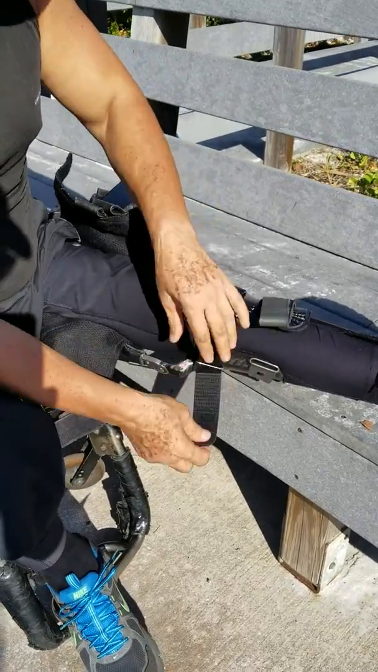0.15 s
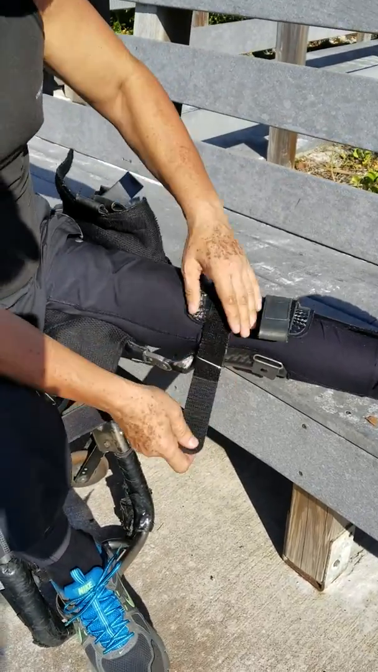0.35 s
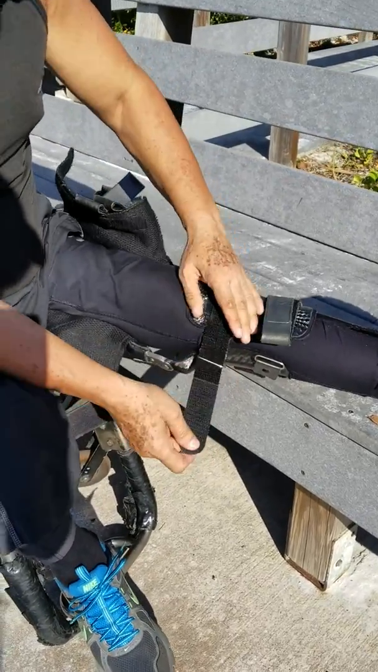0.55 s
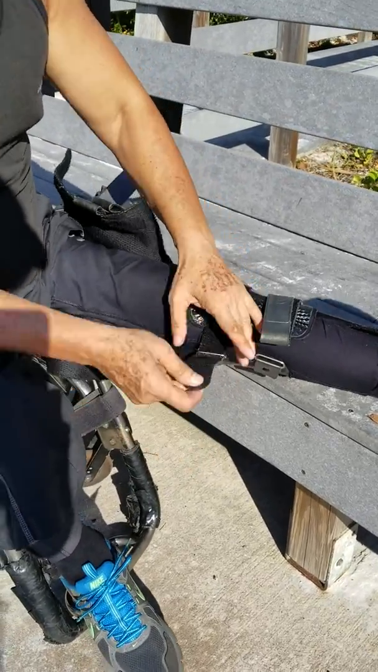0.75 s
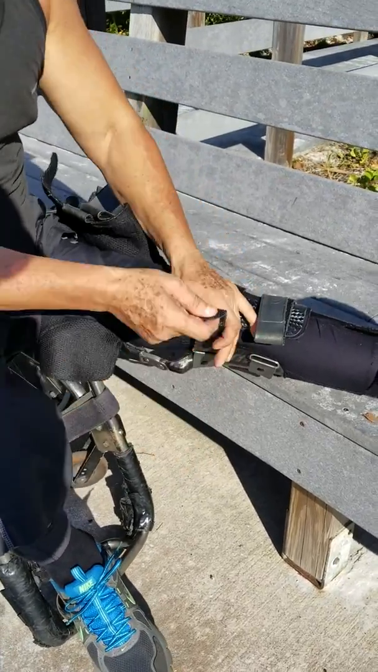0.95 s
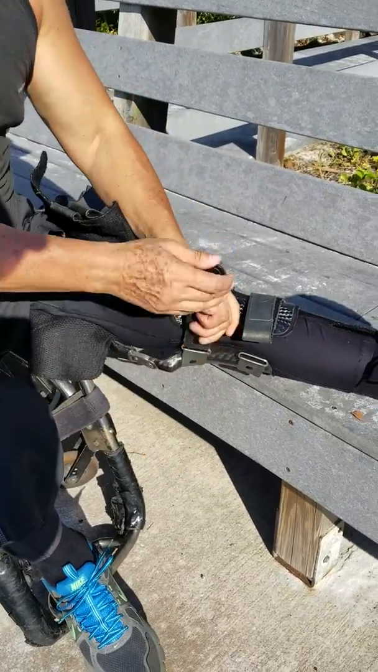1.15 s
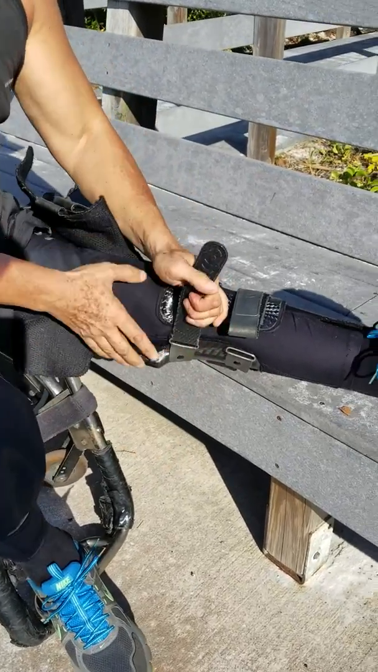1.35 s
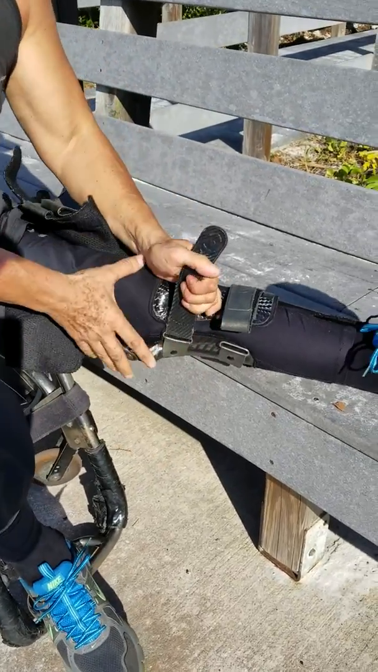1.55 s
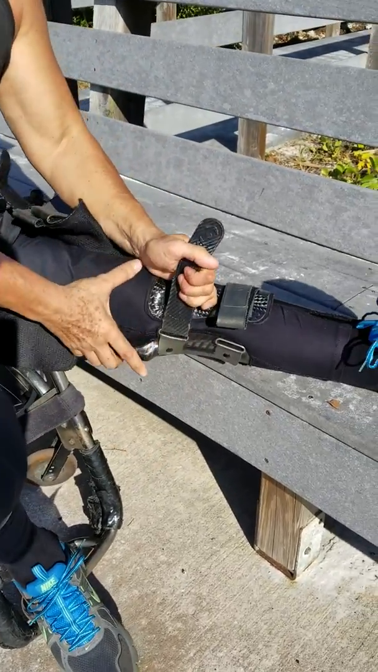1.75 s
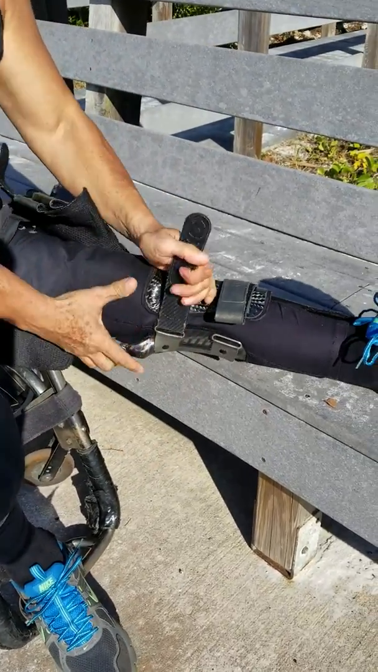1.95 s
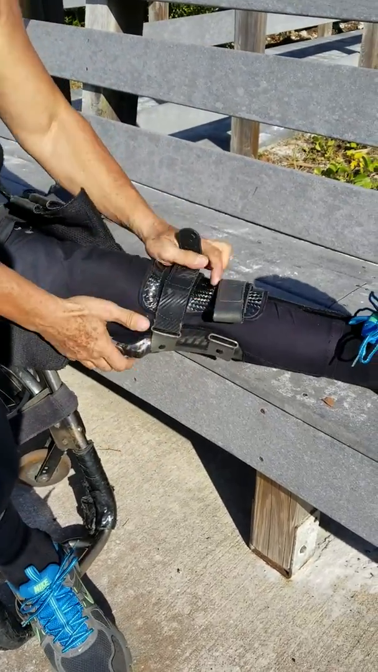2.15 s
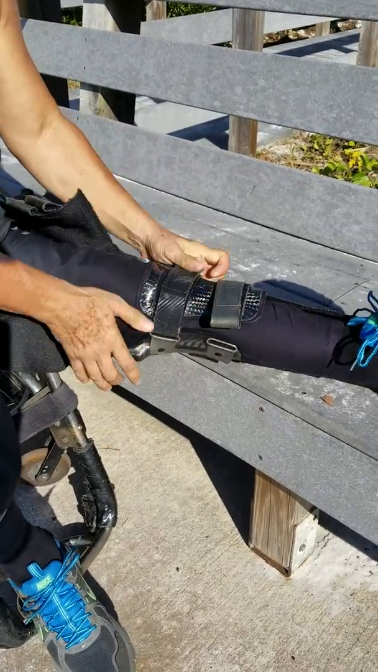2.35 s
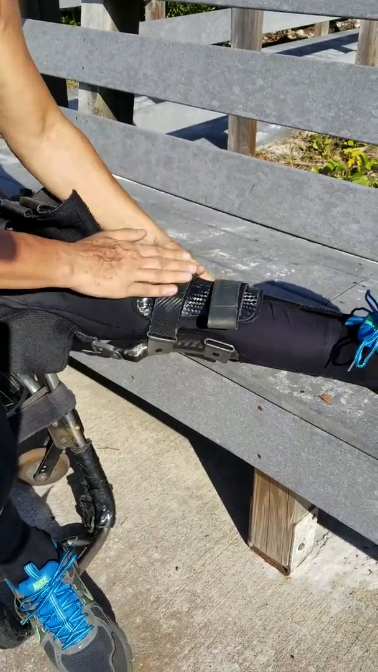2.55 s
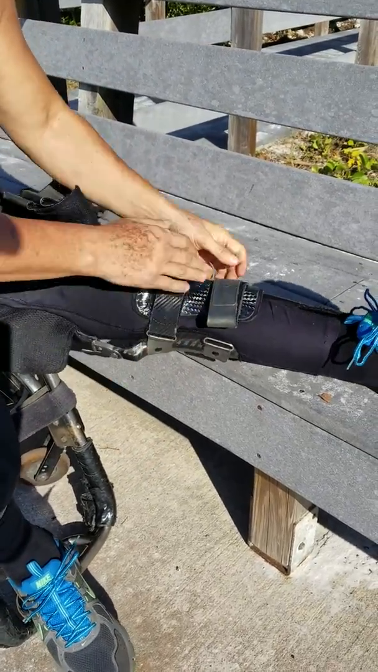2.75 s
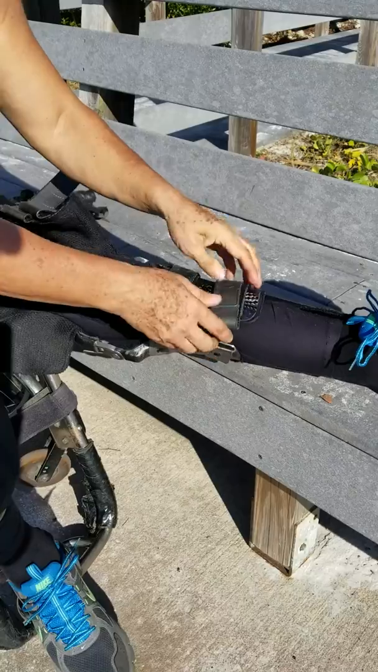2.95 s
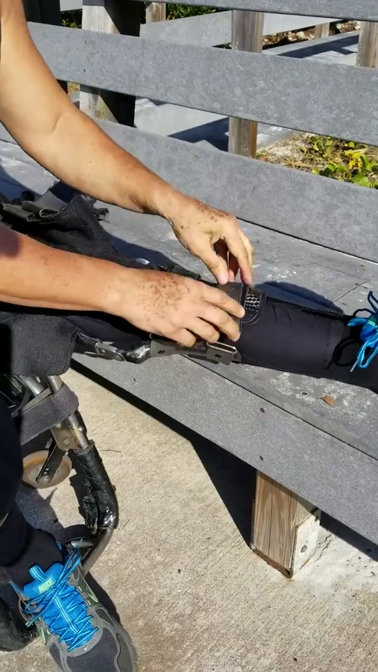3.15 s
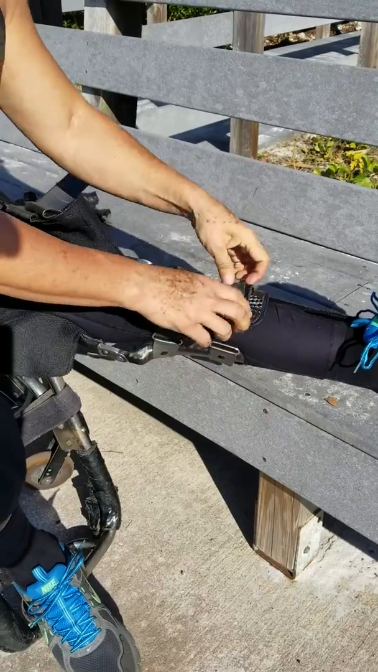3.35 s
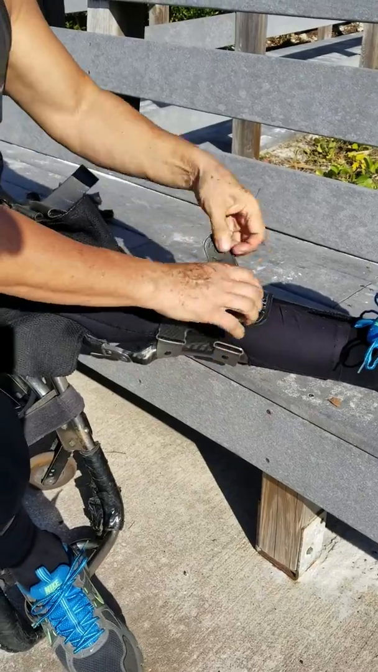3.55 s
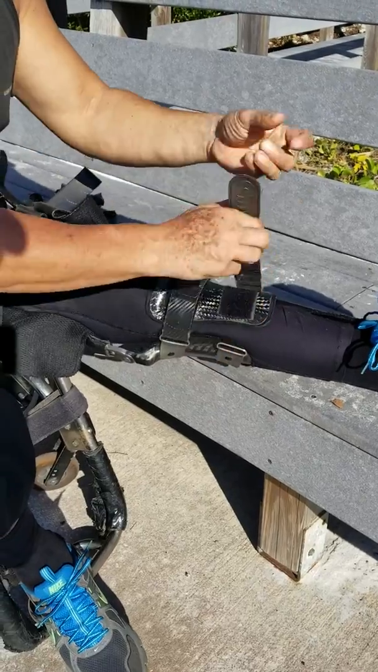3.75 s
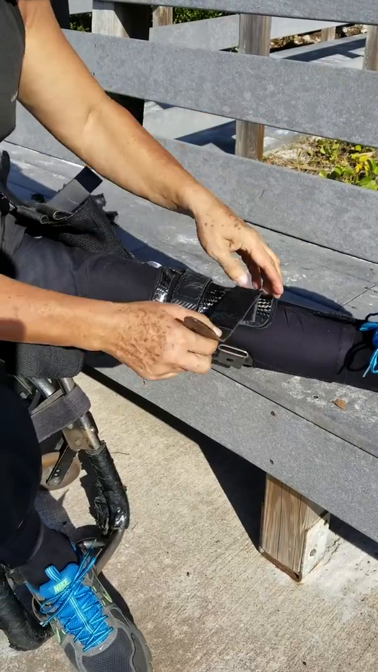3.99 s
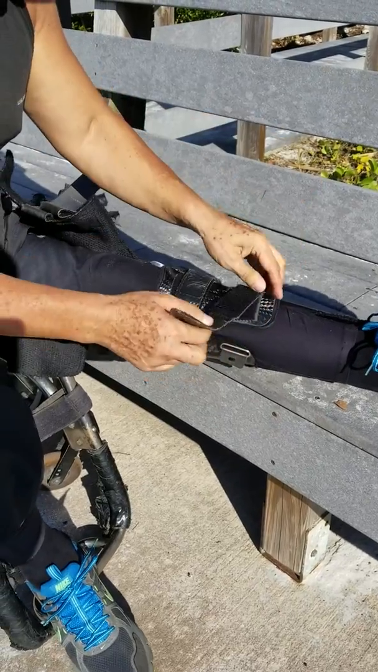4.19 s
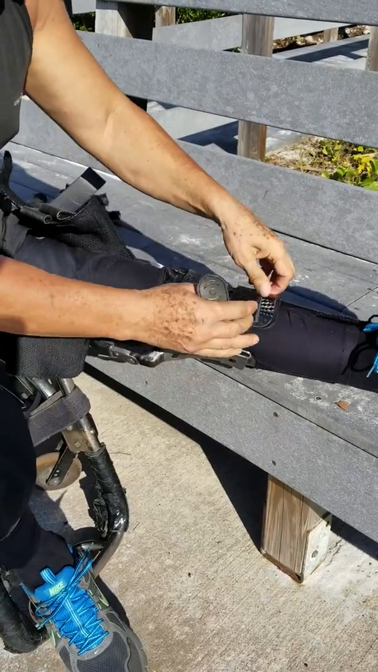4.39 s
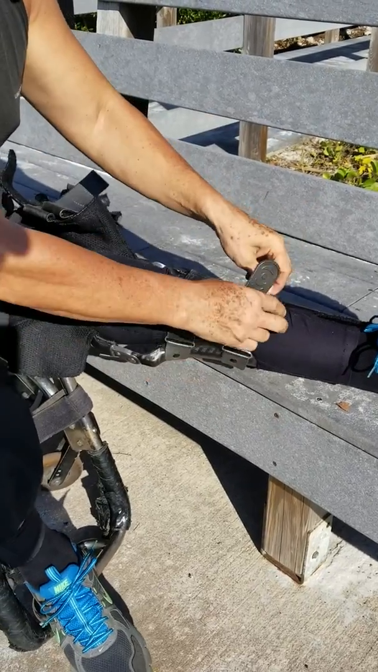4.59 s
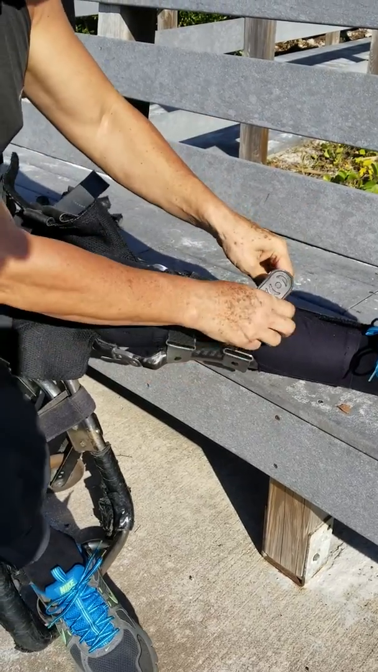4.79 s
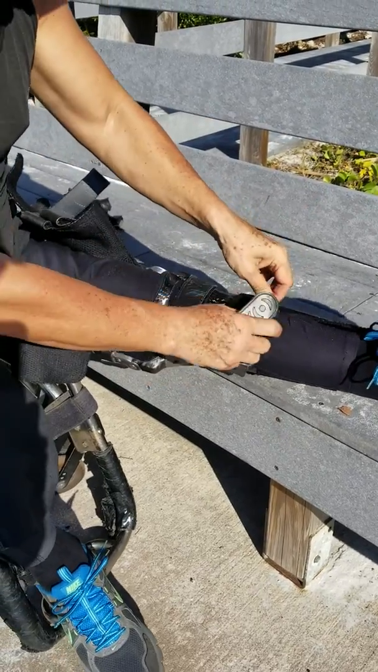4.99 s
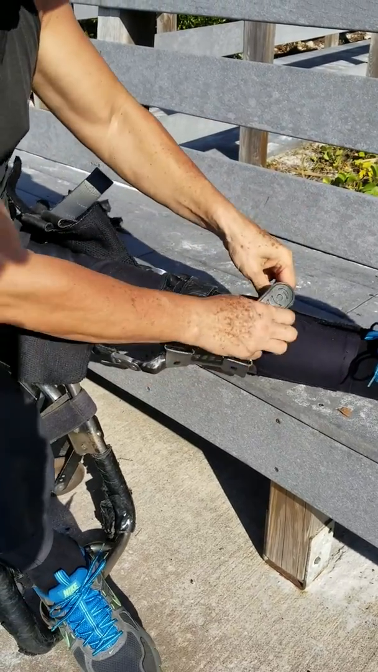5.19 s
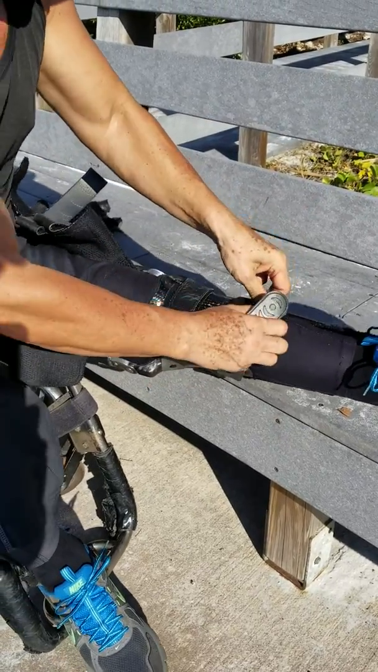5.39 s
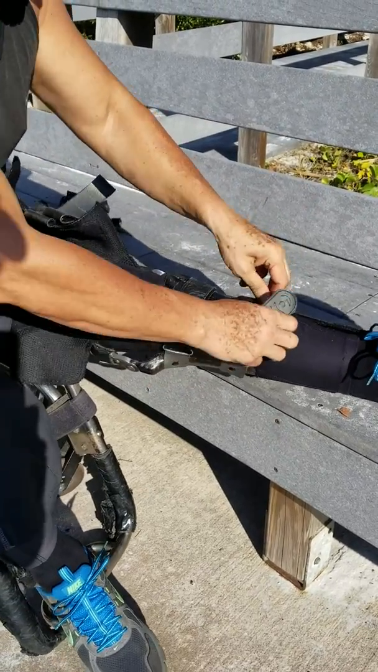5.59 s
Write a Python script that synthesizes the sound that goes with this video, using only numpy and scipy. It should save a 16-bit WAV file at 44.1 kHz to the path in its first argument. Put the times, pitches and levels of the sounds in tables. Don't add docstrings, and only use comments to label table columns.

```python
import sys
import numpy as np
from scipy import signal
from scipy.fft import rfft, irfft, next_fast_len
from scipy.io import wavfile
from scipy.ndimage import uniform_filter1d

SR = 44100
rng = np.random.default_rng(int(sys.argv[2]) if len(sys.argv) > 2 else 0)


def store_pcm(level_fs):
    pcm = np.round(np.clip(level_fs, -1, 1) * 32767).astype(np.int16)
    wavfile.write(sys.argv[1], SR, np.atleast_2d(pcm).T)


def makeup_ratio(level_db):
    decades = np.asarray(level_db, float) / 20
    return 10 ** decades


N = 248283
TIME = np.arange(N) / SR


def unit(x):
    return x / np.sqrt(np.mean(x ** 2) + 1e-20)


def along(points, hz):
    point_hz, value = np.transpose(points)
    return np.interp(np.log(hz + 1), np.log(point_hz + 1), value)


def filtered(x, response):
    size = next_fast_len(N + 8192)
    hz = np.fft.rfftfreq(size, 1 / SR)
    return irfft(rfft(x, size) * response(hz), size)[..., :N]


def shaped(spectrum):
    return lambda hz: makeup_ratio(along(spectrum, hz))


def ringing(modes):
    def response(hz):
        total = 0
        for k, (mode_hz, width_hz, db) in enumerate(modes):
            damping = 1j * hz * width_hz
            total = total + (-1) ** k * makeup_ratio(db) * damping / (mode_hz ** 2 - hz ** 2 + damping)
        return total
    return response


def crackle(per_s, spread_db, life_s, steady):
    happens = rng.random(N) < per_s / SR
    sizes = happens * makeup_ratio(spread_db * np.minimum(rng.exponential(size=N), 3))
    train = signal.lfilter([1], [1, -np.exp(-1 / (life_s * SR))], sizes)
    return unit((unit(train) + steady) * rng.standard_normal((2, N)))


def ports(pair, alike, lead_s):
    def shares(hz):
        turn = np.arccos(np.clip(along(alike, hz), -1, 1)) / 2
        return np.array([np.cos(turn), np.sin(turn)])
    mid, side = filtered(pair, shares)
    delay = lambda hz: np.exp(2j * np.pi * np.outer([0, -lead_s], hz))
    return filtered(np.array([mid + side, mid - side]), delay)


# pitch_hz [Hz], level_db [dB]
SHADE = [(600, 0), (2000, -3), (5000, -3), (9000, -5), (15000, -0.5)]


def shaded(x):
    return filtered(x, lambda hz: makeup_ratio(np.outer([.5, -.5], along(SHADE, hz))))


def engine(rows):
    start_s, pitch_hz, level_db = np.transpose(rows)
    flutter = unit(uniform_filter1d(rng.standard_normal((2, N)), size=2500))
    turns = np.cumsum(np.interp(TIME, start_s, pitch_hz) + 2.6 * flutter[0]) / SR
    loudness = makeup_ratio(np.interp(TIME, start_s, level_db) + 2.0 + 4.0 * flutter[1])
    return loudness * np.sin(2 * np.pi * turns) * [[1], [0]]


# pitch_hz [Hz], level_db [dB per Hz]
TRAFFIC = [(12, -48.5), (20, -35), (70, 0.5), (227, -22.5), (324, -17.5), (698, -33), (754, -31.5),
           (1230, -37), (2100, -36), (2780, -37), (9000, -54), (11700, -82), (19800, -120)]
# start_s [s], pitch_hz [Hz], level_db [dB]
ENGINES = [
    [(0.0, 61.72, -66), (4.75, 63.95, -67), (5.63, 63.5, -59.5)],
    [(0.0, 80.3, -67), (0.69, 102.1, -67.5), (5.63, 79.58, -65)],
    [(0.0, 139.2, -71.5), (5.52, 138.5, -70.5), (5.63, 125.4, -75)],
]
# start_s [s], level_db [dB]
WHINE = [
    (0.0, -95),
    (0.11, -81.5),
    (5.63, -82),
]
# pitch_hz [Hz], likeness [-1 to 1]
FAR_ALIKE = [(60, 0.59), (180, 0.98), (550, 0.67), (1650, -0.14), (4970, 0.0), (15000, 0.0)]


def traffic():
    z = signal.stft(rng.standard_normal((2, N)), nperseg=1024)[2]
    patches = uniform_filter1d(rng.standard_normal(z.shape[1:]), size=6, axis=0)
    patches = unit(uniform_filter1d(patches, size=14, axis=1))
    air = signal.istft(z * makeup_ratio(2.4 * patches), nperseg=1024)[1][:, :N]
    road = makeup_ratio(-61.5) * unit(filtered(air, shaped(TRAFFIC)))
    whine = unit(filtered(air, ringing([(1180, 130, 0)])))
    whine = makeup_ratio(np.interp(TIME, *np.transpose(WHINE))) * whine
    whine = whine * makeup_ratio(5 * unit(uniform_filter1d(rng.standard_normal(N), size=4000)))
    engines = sum(engine(rows) for rows in ENGINES)
    return shaded(ports(road + makeup_ratio(0.5) * whine + engines, FAR_ALIKE, lead_s=0))


def swells(table):
    swell_db = 12
    level_db = np.full(N, -140.)
    for peak_s, rise_s, fall_s, db in table:
        late = TIME - peak_s
        level_db = np.maximum(level_db, db - swell_db * np.maximum(late / fall_s, -late / rise_s))
    return level_db


# peak_s [s], rise_s [s], fall_s [s], fibre_hiss_db [dB], weave_extra_db [dB]
STROKES = [(0.166, 0.13, 0.085, -65, 9), (.24, .1, 0.029, -66, -4), (.7, 0.26, 0.18, -66.5, -2),
           (.99, 0.032, .06, -75, 5), (1.106, 0.028, 0.034, -59, -30), (1.17, 0.11, 0.1, -71, -2),
           (1.4, 0.078, .1, -71, -23), (1.62, 0.18, 0.43, -77.5, -2.5), (1.98, 0.17, 0.34, -73, -0.5),
           (2.19, 0.18, 0.11, -62.5, 2.5), (2.37, 0.23, .15, -67.5, -2.5), (2.53, 0.24, 0.081, -69, 4),
           (2.62, 0.081, .15, -71, 10), (3.12, 0.135, 0.089, -82, 7), (3.7, 0.024, 0.24, -70.5, -0.5),
           (4.03, 0.052, 0.19, -72.5, -0.2), (4.245, 0.13, .1, -73.5, 0.5), (4.345, 0.064, 0.038, -66, -5),
           (4.486, .02, 0.083, -69, -3), (4.71, 0.068, 0.23, -69.5, 0.5), (4.91, 0.12, 0.37, -69.5, 4),
           (5.05, .1, 0.14, -70, 3.5), (5.4, .02, 0.21, -75, 7), (5.53, 0.27, .1, -71.5, -3)]
# peak_s [s], rise_s [s], fall_s [s], level_db [dB]
RUBS = [(.1, 0.12, .08, -64), (.245, 0.13, .03, -65), (.56, 0.081, 0.26, -64.5), (.8, 0.18, .25, -62.5),
        (1.04, 0.19, .3, -59), (1.14, 0.13, .1, -55.5), (1.96, .12, 0.19, -70.5), (2.16, .1, 0.046, -72),
        (2.27, .05, 0.065, -62.5), (2.45, 0.03, 0.044, -65), (2.62, 0.035, 0.08, -59),
        (2.82, 0.35, 0.35, -69.5), (3.15, .2, 0.27, -66), (3.7, 0.056, 0.087, -65.5),
        (3.99, 0.17, 0.27, -64.5), (4.245, 0.16, 0.073, -63.5), (4.33, .05, 0.066, -61.5),
        (4.57, .15, .08, -75), (4.72, .03, .3, -68.5), (4.87, 0.26, 0.32, -70), (5.03, 0.033, 0.029, -63),
        (5.25, 0.36, 0.044, -67), (5.39, 0.068, 0.22, -66)]
# pitch_hz [Hz], level_db [dB per Hz]
FIBRE = [(2940, -11.5), (5000, 0), (6010, -2), (6470, -4.5), (7630, -0.5), (11100, -8), (12100, -6.5),
         (14500, -9), (15900, -13)]
# pitch_hz [Hz], level_db [dB per Hz]
WEBBING = [(760, -4), (1300, 1.5), (1440, -11.5), (1560, -2), (2460, -4.5), (2680, 2.5), (3760, 1),
           (5500, -18.5), (7150, -22), (12100, -120)]
# pitch_hz [Hz], level_db [dB per Hz]
RUB = [(140, -26.5), (230, -16.5), (405, -5), (653, -14), (728, -22.5), (885, -15.5), (1050, -27),
       (1300, -25), (1690, -40), (2860, -120)]


def sliding():
    hiss_db = swells([row[:4] for row in STROKES])
    rub_db = swells(RUBS)
    weave_db = swells([(peak_s, 0.59 * rise_s, 0.66 * fall_s, db + extra_db)
                       for peak_s, rise_s, fall_s, db, extra_db in STROKES])
    fibres = crackle(per_s=900, spread_db=4, life_s=.0015, steady=2)
    slips = crackle(per_s=250, spread_db=4.5, life_s=.004, steady=1.2)
    hiss = makeup_ratio(hiss_db + 5.0) * unit(filtered(fibres, shaped(FIBRE)))
    weave = makeup_ratio(weave_db + 0.5) * unit(filtered(fibres + 0.86 * slips, shaped(WEBBING)))
    rub = makeup_ratio(rub_db - 2.0) * unit(filtered(slips, shaped(RUB)))
    return shaded(hiss + weave + rub)


def band(x, low_hz, high_hz, order):
    return unit(signal.lfilter(*signal.butter(order, [low_hz, high_hz], "band", fs=SR), x))


def contacts(table, t60, rise_s, push):
    heard, t = np.zeros((2, N + SR)), np.arange(SR // 8) / SR
    fade = makeup_ratio(-60 * t / t60) * (1 - np.exp(-t / rise_s))
    blow = push * (t / 0.00021 - 2) * t / 0.00024 * np.exp(-t / 0.00016) * [[1], [0]]
    for start_s, click_db, tick_db, knock_db, knock_hz, click_hz in table:
        noise = rng.standard_normal((3, 2, len(t)))
        tick = band(noise[0], 5800, 13000, order=2)
        click = band(noise[1], 0.974 * click_hz, 1.065 * click_hz, order=1)
        click = click + 1.05 * band(noise[1], 1640, 4270, order=2)
        knock = np.sin(2 * np.pi * knock_hz * t) * [[1], [.25]]
        knock = knock + 0.67 * band(noise[2], 398, 1220, order=2)
        burst = makeup_ratio(tick_db + 8.5) * tick + makeup_ratio(click_db - 7.5) * click + makeup_ratio(knock_db + 5.5) * knock
        heard[:, round(start_s * SR):][:, :len(t)] += fade * burst + makeup_ratio(knock_db + 2) * blow
    return heard[:, :N]


def with_ticks(table, dull_db):
    long_end_hz, short_end_hz, bright_db_per_octave = 1465, 2450, 16
    rows = []
    for start_s, click_db, knock_db, knock_hz, click_hz in table:
        octaves = np.log2(min(click_hz, short_end_hz) / long_end_hz)
        tick_db = click_db + dull_db + bright_db_per_octave * octaves
        rows.append((start_s, click_db, tick_db, knock_db, knock_hz, click_hz))
    return rows


# start_s [s], click_db [dB], knock_db [dB], knock_hz [Hz], click_hz [Hz]
PATS = [(0.0482, -45.5, -64, 437, 3530), (2.0216, -47.5, -60, 1250, 1690), (2.1339, -34, -45, 770, 2780),
        (2.4195, -62.5, -51, 460, 1750), (2.5306, -46, -62, 1170, 3060), (2.5952, -26, -28.5, 830, 1590),
        (3.3152, -41, -60, 414, 1740), (3.3887, -29, -66, 1180, 1780), (3.4495, -25.5, -41.5, 1190, 1800),
        (4.2278, -55.5, -66, 950, 3360), (4.3148, -52, -57.5, 436, 3280), (4.5944, -47.5, -57, 1230, 2160),
        (4.609, -48, -58.5, 930, 2100), (4.9355, -35.5, -51, 870, 2560), (4.9925, -42, -48, 1020, 2780),
        (5.3073, -33.5, -49, 854, 1800)]
# start_s [s], click_db [dB], knock_db [dB], knock_hz [Hz], click_hz [Hz]
SNAPS = [(0.2112, -40.5, -69, 1180, 2200), (1.77, -50.5, -65, 1230, 1640),
         (1.9964, -54.5, -58.5, 473.7, 1770), (2.0956, -46.5, -63, 476, 3180),
         (2.5922, -25.5, -38.5, 806, 3080), (2.7398, -47, -53, 1180, 2080), (4.6895, -48, -58, 501, 2490),
         (4.9057, -42.5, -55, 1180, 2500), (4.9194, -50.5, -54, 1010, 2570),
         (4.9636, -34, -36.5, 440, 1700), (4.9646, -22, -34, 500, 1506), (5.084, -63.5, -52, 546, 2770),
         (5.4042, -42, -43.5, 914, 2930), (5.47, -51, -54.5, 740, 1880)]
# start_s [s], click_db [dB], tick_db [dB]
TICKS = [(0.2435, -50.5, -56.5), (1.5958, -68, -60.5), (2.073, -55, -60), (2.3194, -52, -63),
         (2.3678, -66, -55.5), (2.3895, -59, -55), (3.2415, -59, -67), (3.265, -49, -57.5),
         (3.2873, -39, -53.5), (3.832, -52, -59.5), (4.0785, -65, -62.5), (4.8905, -49, -51.5),
         (5.3638, -42, -60), (5.5242, -53.5, -54.5)]


def taps():
    pats = contacts(with_ticks(PATS, dull_db=-27), t60=0.038, rise_s=0.0018, push=0)
    snaps = contacts(with_ticks(SNAPS, dull_db=-32.5), t60=0.019, rise_s=0.00086, push=3.4)
    ticks = [(start_s, click_db, tick_db, -120, 500, 3300) for start_s, click_db, tick_db in TICKS]
    hooks = contacts(ticks, t60=0.02, rise_s=0.0012, push=0)
    return pats + snaps + hooks


def curves(tables):
    rows = np.array([row for table in tables for row in table])
    sounding = sum((TIME >= table[0][0]) & (TIME <= table[-1][0]) for table in tables) > 0
    columns = [np.interp(TIME, rows[:, 0], column) for column in rows[:, 1:].T]
    return uniform_filter1d(sounding * 1., size=300), columns


# start_s [s], pull_db [dB], shell_load_db [dB passed to the shell]
RIPS = [
    [(3.235, -89, -7), (3.26, -64, -24), (3.305, -78.5, -9), (3.322, -60.5, -17.5), (3.377, -60, -24)],
    [(3.378, -61.5, -25.5), (3.395, -48, -14.5), (3.44, -54, -3), (3.46, -45.5, 0), (3.53, -45.5, -2.5),
     (3.59, -32.5, 1), (3.65, -41.5, -13.5), (3.665, -65.5, 0.5), (3.695, -70.5, -2)],
    [(3.73, -77, -8), (3.75, -48, -40), (3.775, -76, -21)],
    [(5.282, -90, 5), (5.29, -61, -5), (5.31, -56, -0.5), (5.335, -58.5, 4.5), (5.375, -77.5, 13),
     (5.42, -82, 7)],
]
# pitch_hz [Hz], width_hz [Hz], level_db [dB]
STRAP = [(1700, 100, -2), (2320, 90, 1), (2550, 130, -4), (2880, 110, -1), (3300, 100, 1), (3900, 170, -1),
         (4350, 170, -3), (4900, 350, -7)]
# pitch_hz [Hz], width_hz [Hz], level_db [dB]
SHELL = [(500, 51, 6.5), (700, 710, -8), (883, 75, 7), (1180, 96, 2.5)]


def ripping():
    slack_hz, taut_db, octaves_per_db = 2230, -55, -1.5
    on, (snap_db, load_db) = curves(RIPS)
    strap_db = snap_db + 5 + 0.32 * load_db
    shell_db = snap_db + load_db
    tone_hz = slack_hz * 2 ** (octaves_per_db * np.maximum(snap_db - taut_db, 0))
    hooks = crackle(per_s=2500, spread_db=2.5, life_s=.0003, steady=.5)
    tugs = crackle(per_s=600, spread_db=2, life_s=.0003, steady=.25)
    weights = np.array([makeup_ratio(db) * (0.48 + np.exp(-(np.log(tone_hz / mode_hz) / 0.64) ** 2))
                        for mode_hz, _, db in STRAP])
    drift = unit(uniform_filter1d(rng.standard_normal(weights.shape), size=900))
    weights = weights * makeup_ratio(3.4 * drift)
    strap = 0
    for k, (mode_hz, width_hz, _) in enumerate(STRAP):
        mode = unit(filtered(hooks + 0.63 * tugs, ringing([(mode_hz, width_hz, 0)])))
        strap = strap + (-1) ** k * weights[k] * mode
    strap = strap / np.linalg.norm(weights, axis=0)
    snaps = makeup_ratio(snap_db + 5) * unit(filtered(hooks, shaped(FIBRE)))
    body = lambda hz: ringing(SHELL)(hz) * ringing([(800, 1400, 0)])(hz) ** 2
    shell = makeup_ratio(shell_db) * unit(filtered(tugs, body))
    return on * (snaps + makeup_ratio(strap_db + 4.0) * strap + shell)


# pitch_hz [Hz], t60_s [s to fade by 60 dB]
DECK = [(300, 0.051), (2000, 0.081), (10000, 0.037)]


def deck(x):
    hz, t, z = signal.stft(rng.standard_normal((2, SR // 4)), SR, nperseg=128)
    fade = makeup_ratio(-60 * t / along(DECK, hz)[:, None])
    tail = signal.istft(z * fade, SR, nperseg=128)[1]
    tail = np.pad(tail, ((0, 0), (100, 0))) / np.linalg.norm(tail[0])
    return signal.fftconvolve(x, tail, axes=1)[:, :N]


# pitch_hz [Hz], likeness [-1 to 1]
NEAR_ALIKE = [(300, .97), (900, .92), (2000, .75), (4000, .65), (8000, .55)]


def scene():
    near = ports(sliding() + taps() + ripping(), NEAR_ALIKE, lead_s=.00008)
    return traffic() + near + makeup_ratio(-13.0) * deck(near)


def low_pass(x):
    return signal.sosfilt(signal.butter(12, 16090, fs=SR, output="sos"), x)


# pitch_hz [Hz], left_minus_right_db [dB]
PORTS = [(100, -.5), (1000, -1.5), (2500, -2.3), (5000, -2.5), (9000, -.5), (15000, 0)]


def record(dry):
    heard = filtered(dry, lambda hz: makeup_ratio(np.outer([.5, -.5], along(PORTS, hz))))
    heard = heard + makeup_ratio(-78.5) * rng.standard_normal((2, N))
    limited = filtered(heard, lambda hz: hz < 15800)
    return low_pass(limited)


dry = scene()
out = record(dry)
store_pcm(out)
```